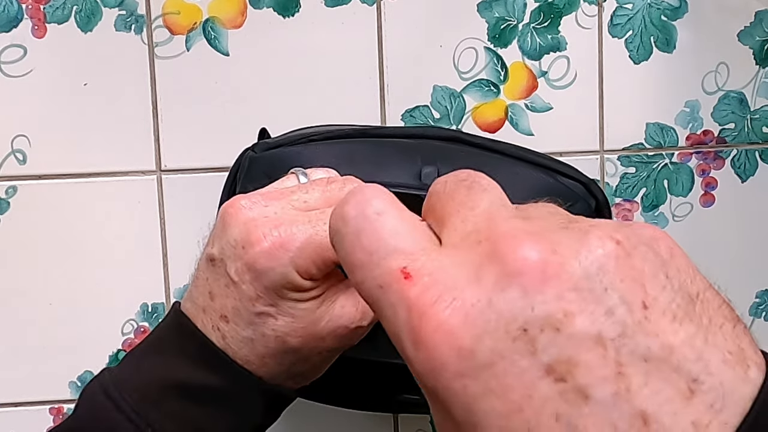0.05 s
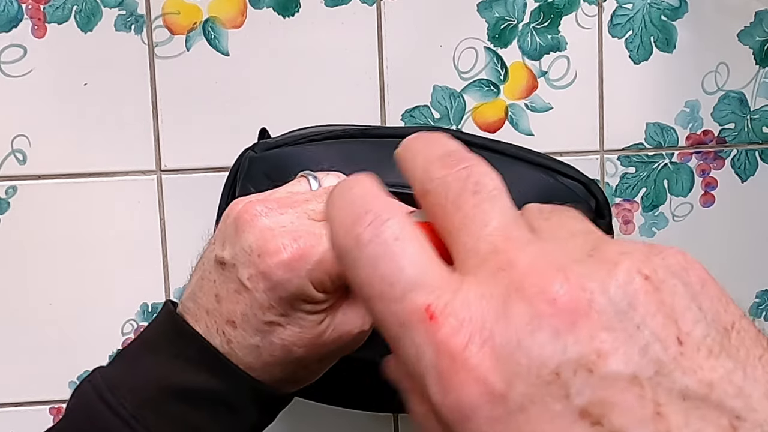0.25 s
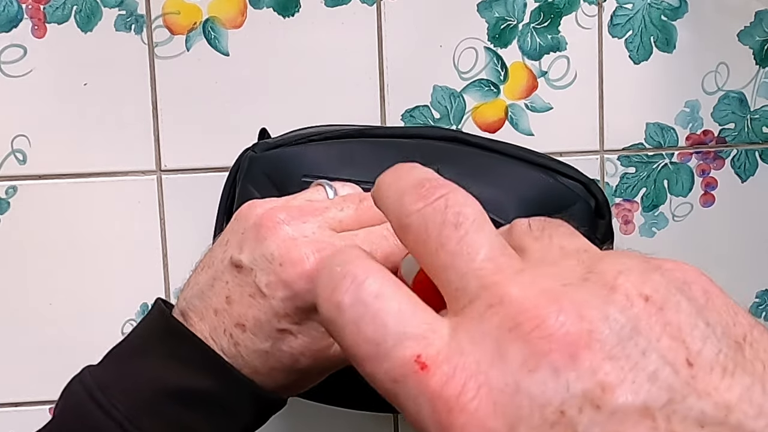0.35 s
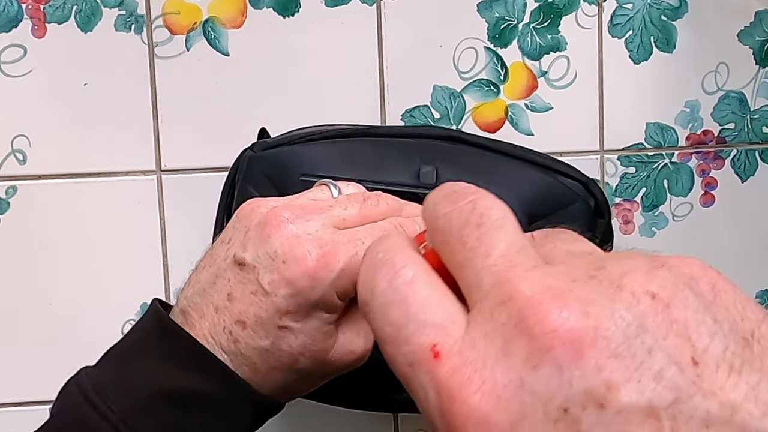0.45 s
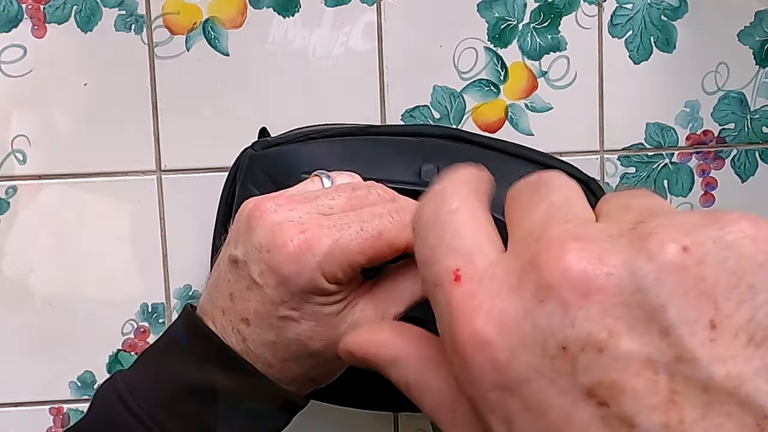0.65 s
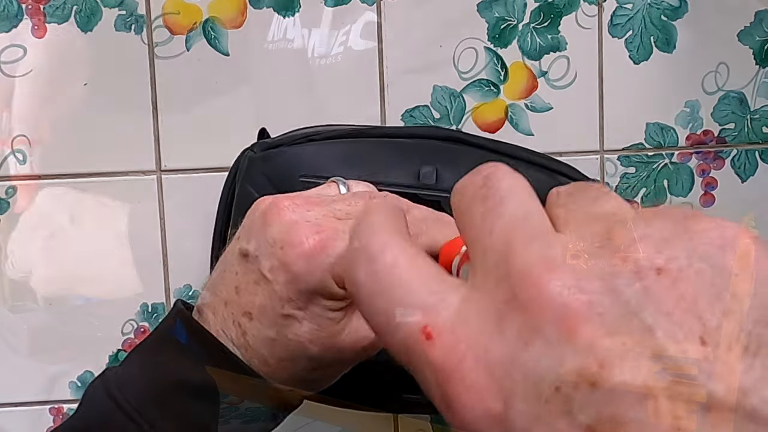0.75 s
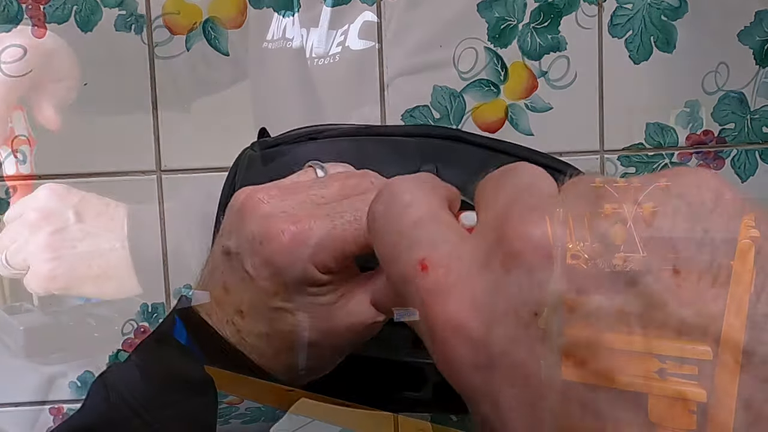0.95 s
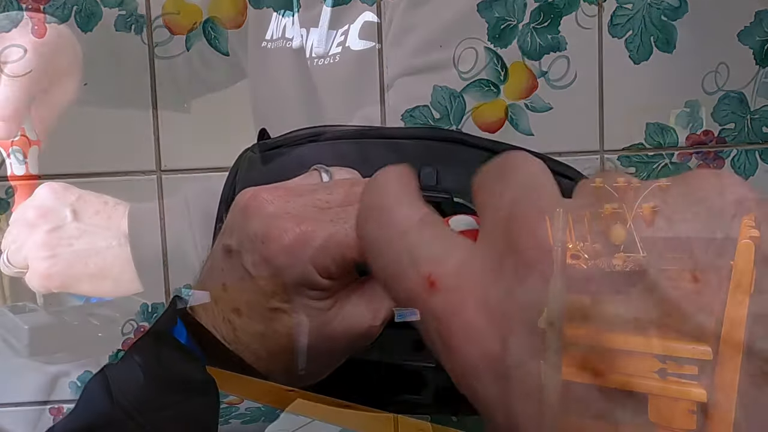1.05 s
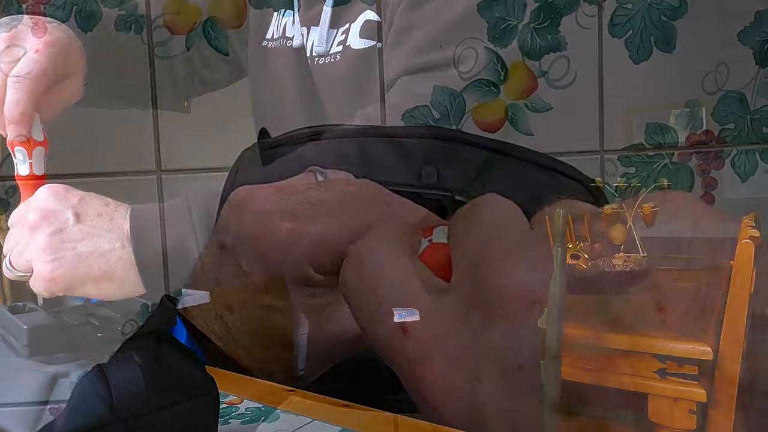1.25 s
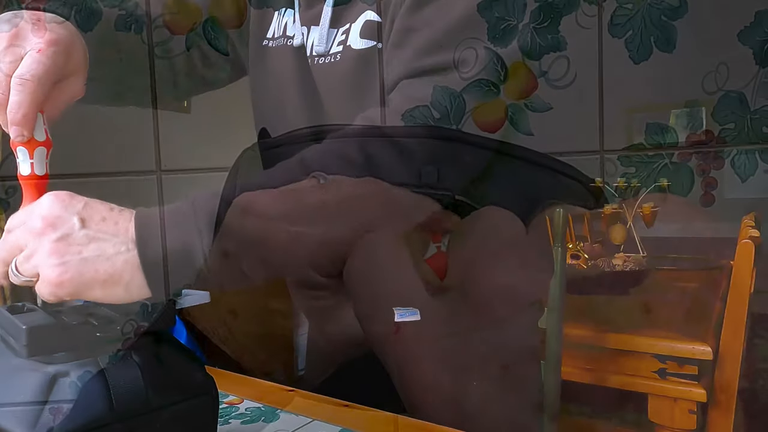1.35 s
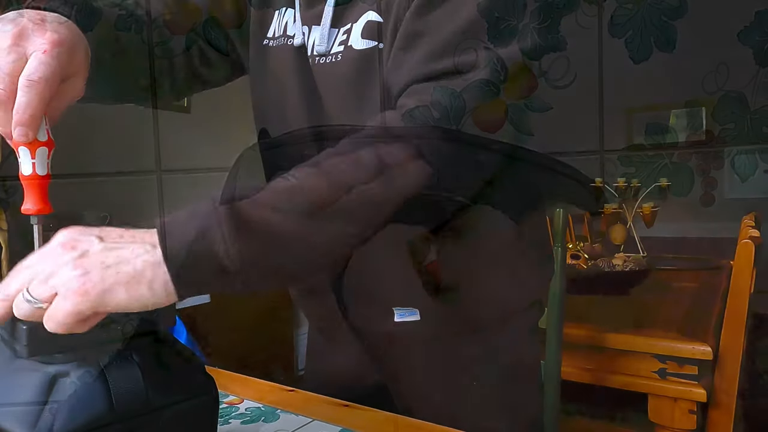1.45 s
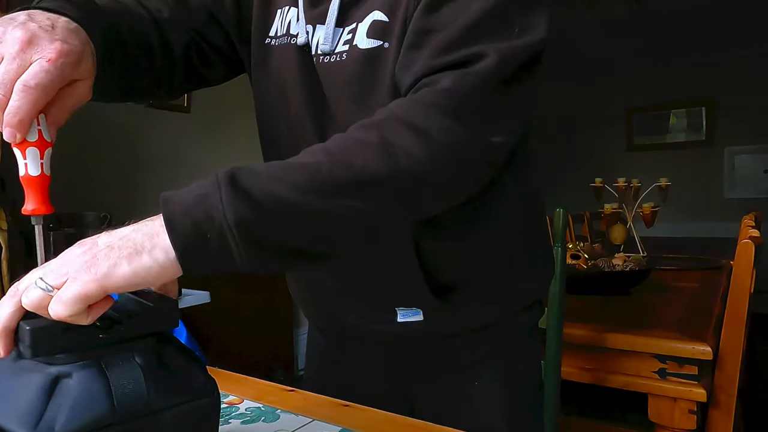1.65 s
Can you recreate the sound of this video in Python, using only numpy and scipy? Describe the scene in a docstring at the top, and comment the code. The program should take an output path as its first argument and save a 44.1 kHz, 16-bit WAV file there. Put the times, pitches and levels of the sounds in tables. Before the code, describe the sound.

A plastic catch on a stiff bag gives a small click, then snaps open loudly with a thud on the table. Light ticks and knocks of hands and a tool follow, heard close in a small, hard-walled room.

```python
"""A plastic catch snaps open

Hands work a tool against a stiff bag on a tiled table. A plastic catch slips once, creaks, then snaps
open: each blow cracks and excites damped modes of the catch, the shell and the table top, which thuds
and rocks. Light handling ticks come before and after, and a sleeve brushes past at the end.
A small hard-walled room reverberates, over faint rumble and hiss."""
import sys
import numpy as np
from scipy import signal
from scipy.fft import rfft, irfft, next_fast_len
from scipy.io import wavfile

SR = 44100
rng = np.random.default_rng(int(sys.argv[2]) if len(sys.argv) > 2 else 0)


def wrap_up_sound(samples):
    """Save the sound to the file named by the first command line argument, as 16-bit audio."""
    columns = np.atleast_2d(samples).T
    # keep every value between -1 and 1, then stretch to whole-number steps
    tamed = np.clip(columns, -1, 1)
    steps = np.round(tamed * 32767).astype(np.int16)
    wavfile.write(sys.argv[1], SR, steps)


N = 74970
TIME_S, BIN_HZ = np.arange(N) / SR, np.fft.rfftfreq(N, 1 / SR)


def undb(db):
    """Amplitude ratio of a level in decibels."""
    return 10 ** (np.asarray(db) / 20)


def along(points, hz):
    """Interpolation of a table on a logarithmic frequency axis."""
    frequencies, values = np.array(points, float).T
    return np.interp(np.log(np.maximum(hz, 1)), np.log(frequencies), values)


def colour(x, spectrum):
    """Minimum-phase filtering: a causal cepstrum shapes the spectrum without pre-ringing."""
    size = next_fast_len(2 * N)
    size += size % 2
    cepstrum = irfft(along(spectrum, np.fft.rfftfreq(size, 1 / SR)) * np.log(10) / 20)
    cepstrum[1:size // 2] *= 2
    cepstrum[size // 2 + 1:] = 0
    return irfft(rfft(x, size) * np.exp(rfft(cepstrum)))[:N]


def noise(spectrum):
    """Stationary coloured noise of unit variance."""
    x = irfft(rfft(rng.standard_normal(N)) * undb(along(spectrum, BIN_HZ)), N)
    return x / x.std()


def fade(t60_s):
    """Exponential decay by 60 dB in t60_s, which is held to at least 1 ms."""
    return np.exp(-np.minimum(np.log(1000) * TIME_S / max(t60_s, 1e-3), 40))


def at(x, start_s):
    """Pure delay of a sound to its onset."""
    return np.concatenate([np.zeros(max(int(start_s * SR), 0)), x])[:N]


def ring(modes, band_hz):
    """Modal superposition: damped sinusoids, heard through the band that the part radiates."""
    x = sum(undb(db) * fade(t60_s) * np.sin(2 * np.pi * hz * TIME_S) for hz, db, t60_s in modes)
    return signal.sosfilt(signal.butter(2, band_hz, "bandpass", fs=SR, output="sos"), x)


def bursts(starts_s, levels_db, spectrum, t60_s, cutoffs_hz=12000):
    """Impact noise: a decaying burst for each hit; a softer contact has a lower cutoff."""
    envelope, white, hits = fade(t60_s), rng.standard_normal(N), 0
    for start_s, db, cutoff_hz in zip(starts_s, levels_db, np.broadcast_to(cutoffs_hz, len(starts_s))):
        grain = np.roll(white, rng.integers(N)) * envelope
        lowpass = signal.butter(2, cutoff_hz, fs=SR, output="sos")
        hits += at(undb(db) * signal.sosfilt(lowpass, grain / np.linalg.norm(grain)), start_s)
    rms_gain = np.sqrt(np.mean(undb(along(spectrum, BIN_HZ)) ** 2))
    return colour(hits, spectrum) / rms_gain


def background():
    """Ambient noise floor: steady rumble with a weaker hiss."""
    # noise spectrum: frequency_hz, density_db
    spectrum = [(12, 2.5), (28, 4), (42, 1), (60, -5.5), (80, -13.5), (120, -14), (170, -29.5), (280, -22),
                (420, -31), (600, -34.5), (1100, -32), (2000, -49), (4000, -48.5), (8000, -53),
                (15000, -54.5)]
    return undb(-50) * noise(spectrum)


def handling():
    """Light impacts of fingers and tool on the bag: a dull knock, a plastic clack and a thin tick."""
    # contacts, with relative levels: start_s, knock_db, clack_db, tick_db
    contacts = [(0.06, -49, -67.5, -80), (0.399, -42.5, -56, -78), (0.665, -40, -50, -63),
                (0.7242, -43.5, -44.5, -52), (0.774, -46, -53.5, -74), (0.8230, -46, -44.5, -45),
                (0.871, -53, -47, -58), (0.972, -48, -58, -83), (1.157, -48.5, -48, -80),
                (1.1798, -41.5, -45, -51.5), (1.261, -67, -50.5, -79), (1.59, -48.5, -49.5, -76),
                (1.603, -58, -43, -62), (1.637, -51.5, -44.5, -65), (1.6472, -42, -40.5, -53),
                (1.651, -46, -50, -54.5)]
    # spectra of the three parts: frequency_hz, density_db
    knock = [(100, -21), (200, 0.5), (270, 3.5), (410, 7), (550, -5), (800, -5.5), (1500, -44), (4000, -59)]
    clack = [(150, -38), (400, -13.5), (750, -1.5), (1080, 8.5), (1300, 3.5), (1550, 3.5), (1850, -8),
             (2300, -6), (3200, -16.5), (6000, -59.5), (12000, -59)]
    tick = [(500, -37.5), (1500, -9.5), (2800, 8.5), (4000, 9), (5500, 3.5), (7000, 0), (9000, -18),
            (15000, -26.5)]
    starts_s, knock_db, clack_db, tick_db = np.array(contacts).T
    return (bursts(starts_s, knock_db + 20, knock, t60_s=0.076)
            + bursts(starts_s, clack_db + 16.5, clack, t60_s=0.035)
            + bursts(starts_s, tick_db + 11.5, tick, t60_s=0.009))


def creaks():
    """Free vibration after a slip: the plastic rings briefly on one pitch."""
    # slips of the plastic: start_s, pitch_hz, level_db
    slips = [(0.2062, 5210, -50), (1.181, 2224, -49), (1.603, 2530, -50.5), (1.638, 2120, -48.5)]
    rise_s = 0.00037
    envelope = (1 - np.exp(-TIME_S / rise_s)) * fade(t60_s=0.025)
    return sum(at(undb(db) * envelope * np.sin(2 * np.pi * hz * TIME_S), s) for s, hz, db in slips)


def snap():
    """Impulsive excitation: each blow cracks and rings the catch, then the shell, then the table."""
    # blows, with relative levels: start_s, catch_db, shell_db, table_db, crack_db, crack_cutoff_hz
    blows = [(0.2066, -42, -42, -17.5, -14.5, 5930), (0.2127, -48.5, -26.5, -7.5, -30, 3000),
             (0.2162, -47.5, -29.5, -8, -22, 5610), (0.4277, -48.5, -22, -11.5, -35, 3000),
             (0.4322, -25.5, -20, -38, -7, 7500), (0.4430, -2, 0, 3, 0.5, 15000),
             (0.4458, -10, -14, -10, -3, 14100), (0.4576, -27.5, -20.5, -6, -10, 7000)]
    # equally damped modes of the catch: pitch_hz, level_db
    catch_modes = [(2015, -27), (2215, -15.5), (2370, -20.5), (2730, -32.5), (3330, -33.5), (4520, -34),
                   (5340, -29), (6000, -39.5)]
    # modes of the shell and of the table top: pitch_hz, level_db, t60_s
    shell_modes = [(664, -20, 0.013), (828, -19, 0.019), (969, -12, 0.036), (1115, -28, 0.04),
                   (1565, -19.5, 0.015)]
    table_modes = [(115.6, -28, 0.27), (176.8, -28, 0.073), (222.9, -34.5, 0.23), (249, -23, 0.032),
                   (279.8, -45, 0.16), (354.5, -41, 0.23), (388.2, -35.5, 0.19), (569.5, -43.5, 0.098)]
    # spectrum of the crack: frequency_hz, density_db
    crack_spectrum = [(500, -0.5), (1500, -2.5), (2400, 3), (3200, -1.5), (4000, -7.5), (5500, 1),
                      (8000, -15), (11000, -8), (14000, -13.5), (16000, -24)]
    catch_t60_s = 0.016
    shell_lag_s, table_lag_s = 0.0015, 0.0016  # the blow reaches the larger parts later
    catch = ring([(hz, db, catch_t60_s) for hz, db in catch_modes], band_hz=(700, 6500))
    shell = at(ring(shell_modes, band_hz=(300, 2400)), shell_lag_s)
    table = at(ring(table_modes, band_hz=(110, 890)), table_lag_s)
    ringing = sum(at(undb(catch_db) * catch + undb(shell_db) * shell + undb(table_db) * table, start_s)
                  for start_s, catch_db, shell_db, table_db, _, _ in blows)
    starts_s, *_, crack_db, cutoffs_hz = np.array(blows).T
    return ringing + bursts(starts_s, crack_db - 11.5, crack_spectrum, t60_s=0.024, cutoffs_hz=cutoffs_hz)


def rocking():
    """Damped oscillation: the table sways at a low frequency after the snap."""
    sway_hz = 29.6
    sway = fade(t60_s=0.55) * np.sin(2 * np.pi * sway_hz * TIME_S)
    return at(undb(-33.5) * sway, start_s=0.49)


def sleeve():
    """Friction noise: cloth starts to slide with a faint hiss."""
    # spectrum of sliding cloth: frequency_hz, density_db
    spectrum = [(500, -17), (1300, -8), (3000, 4), (6500, -2), (11000, -9), (15000, -25)]
    start_s, rise_s = 1.64, 0.037
    return undb(-69) * noise(spectrum) * np.clip((TIME_S - start_s) / rise_s, 0, 1)


def room(x):
    """Reverberation: early reflections off the tiles, and a diffuse tail with a decay rate per octave."""
    # reverberation times (a negative one acts as 1 ms): frequency_hz, t60_s
    decay_times = [(100, 1.12), (300, 0.7), (1000, 0.55), (2200, 0.8), (5000, 0.39), (8000, 0.58),
                   (14000, -0.45)]
    # strength of the tail: frequency_hz, gain_db
    tail_gains = [(60, -14), (130, -14.5), (250, -5.5), (430, -4), (600, -10.5), (780, -10.5), (1000, -9.5),
                  (1350, -10), (2300, -16.5), (3200, -9.5), (5000, -14.5), (12000, -10)]
    delay_s, build_s = 0.004, 0.0055
    white, centres_hz = rfft(rng.standard_normal(N)), 2. ** np.arange(6, 15)
    tail = 0
    for centre_hz, share in zip(centres_hz, np.eye(len(centres_hz))):
        octave = irfft(white * along(list(zip(centres_hz, share)), BIN_HZ), N)
        envelope = fade(along(decay_times, centre_hz)) * (1 - np.exp(-TIME_S / build_s))
        tail += octave * envelope / np.linalg.norm(envelope)
    early = rng.standard_normal(N) ** 3 * fade(t60_s=0.05)  # cubing makes a few reflections stand out
    response = colour(tail, tail_gains) + undb(-13.5) * early / np.linalg.norm(early)
    return signal.fftconvolve(x, at(response, delay_s))[:N]


def scene():
    """Superposition of the contact sounds, their reverberation, sway, sleeve and background."""
    direct = snap() + handling() + creaks()
    return (direct + room(direct) + rocking() + sleeve() + background())[None]


def record(dry):
    """Band limiting: a steep elliptic low-pass removes the highest treble."""
    cutoff_hz = 15900
    return signal.sosfilt(signal.ellip(8, .2, 70, cutoff_hz, fs=SR, output="sos"), dry)


dry = scene()
out = record(dry)
wrap_up_sound(out)
```